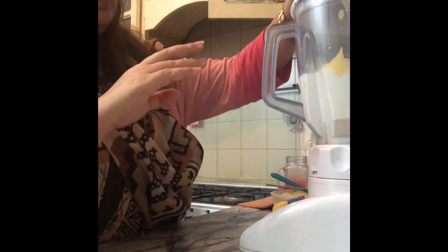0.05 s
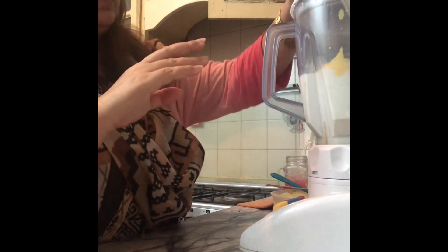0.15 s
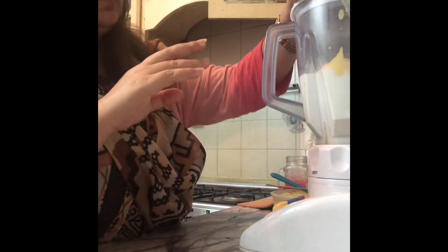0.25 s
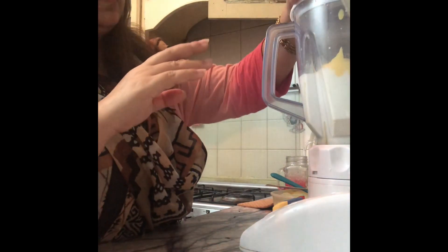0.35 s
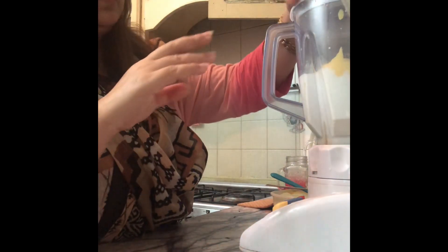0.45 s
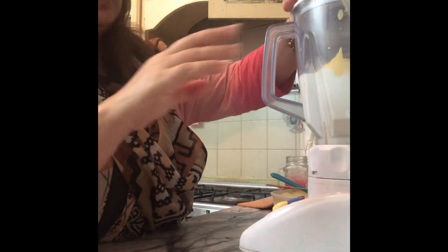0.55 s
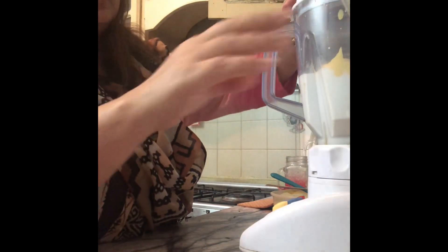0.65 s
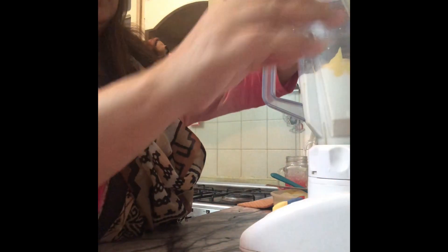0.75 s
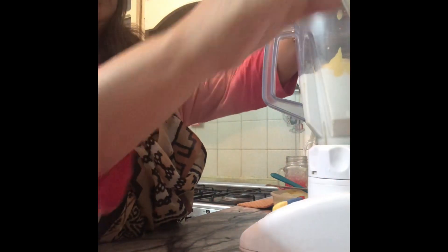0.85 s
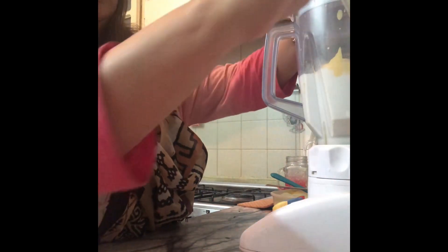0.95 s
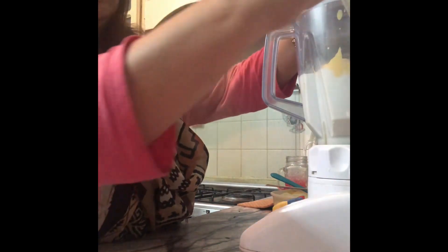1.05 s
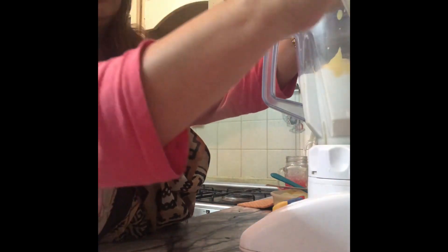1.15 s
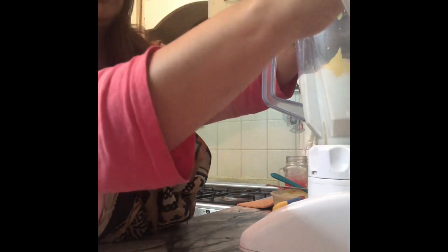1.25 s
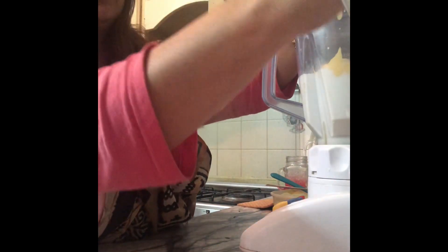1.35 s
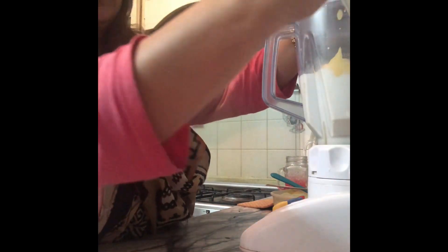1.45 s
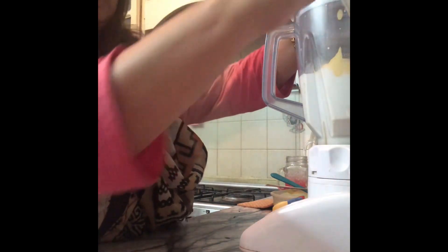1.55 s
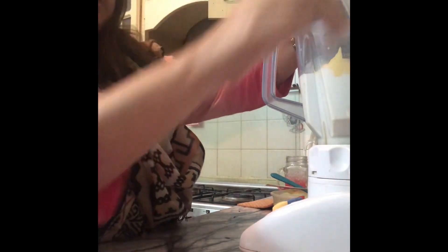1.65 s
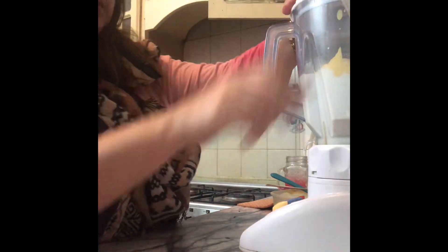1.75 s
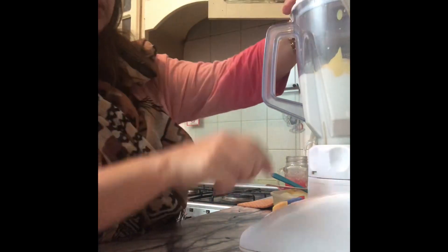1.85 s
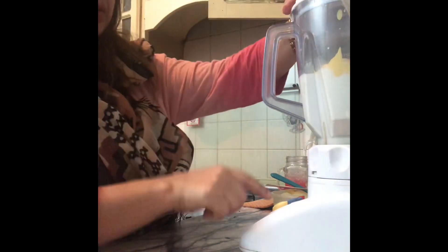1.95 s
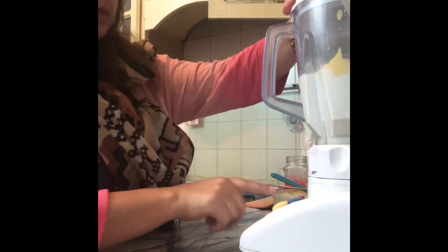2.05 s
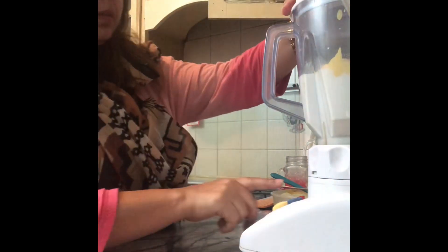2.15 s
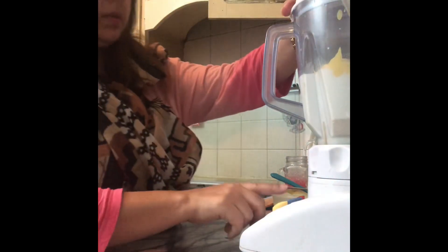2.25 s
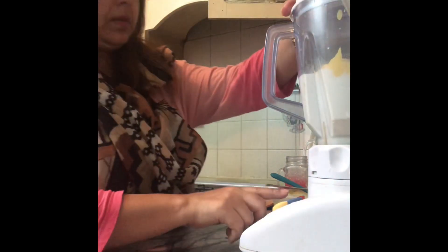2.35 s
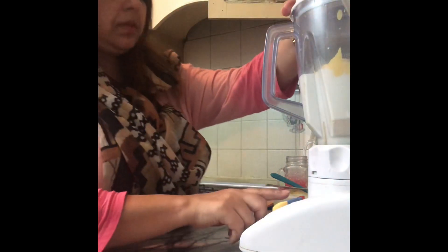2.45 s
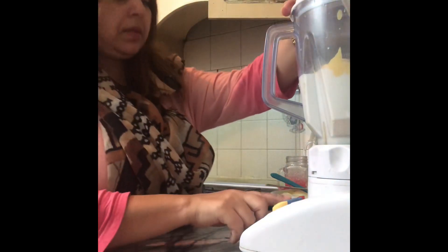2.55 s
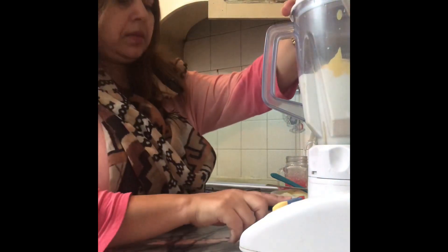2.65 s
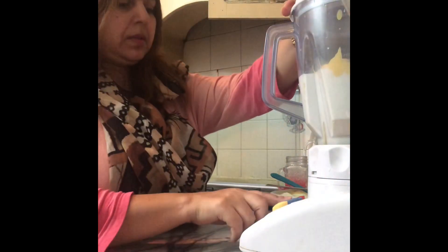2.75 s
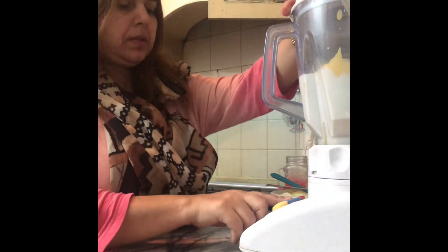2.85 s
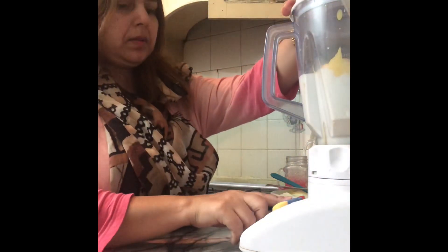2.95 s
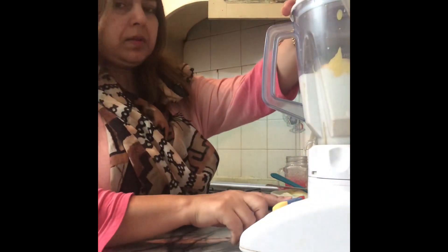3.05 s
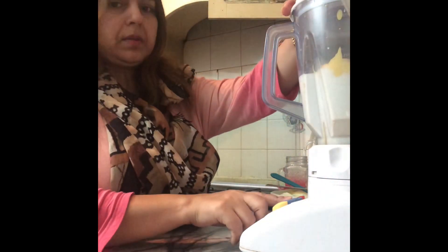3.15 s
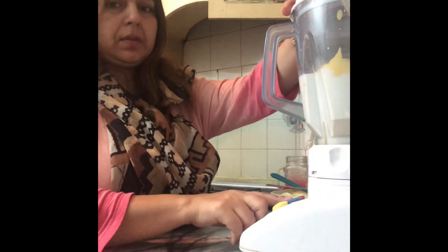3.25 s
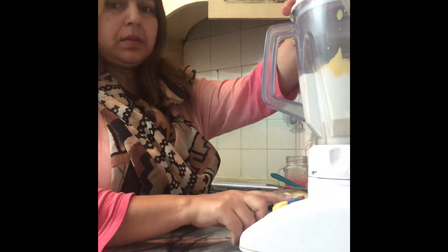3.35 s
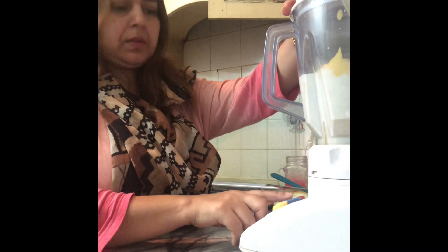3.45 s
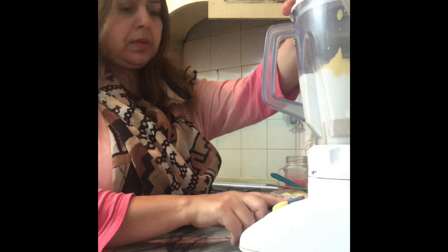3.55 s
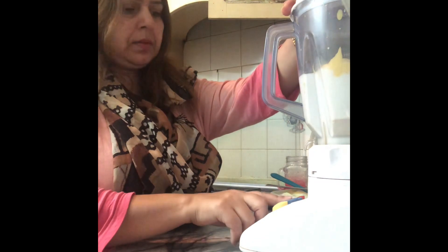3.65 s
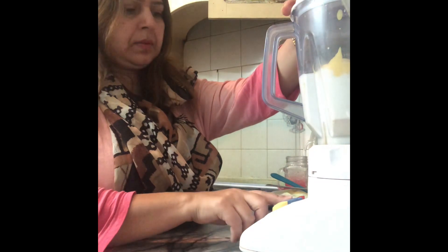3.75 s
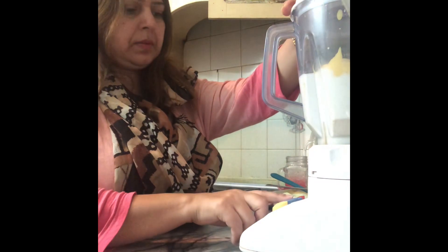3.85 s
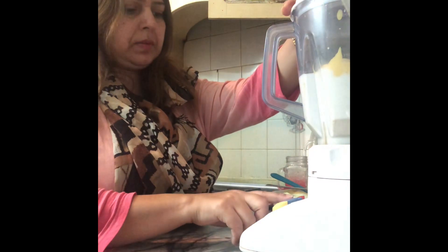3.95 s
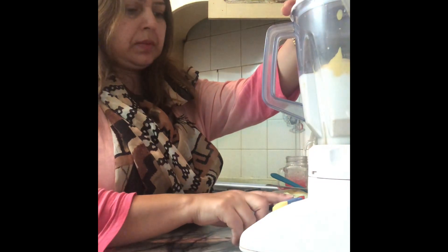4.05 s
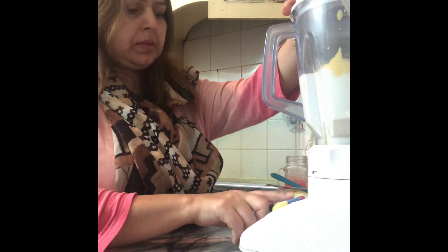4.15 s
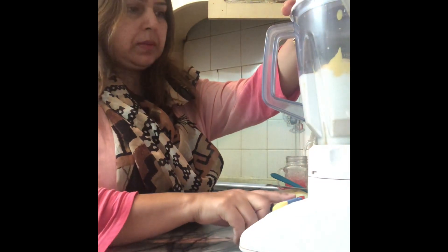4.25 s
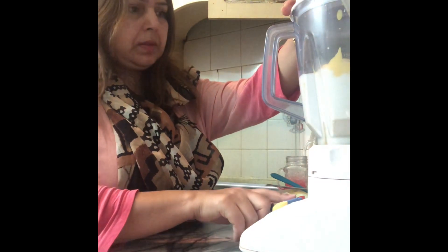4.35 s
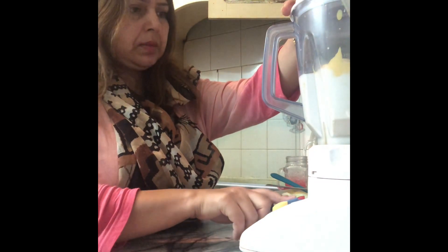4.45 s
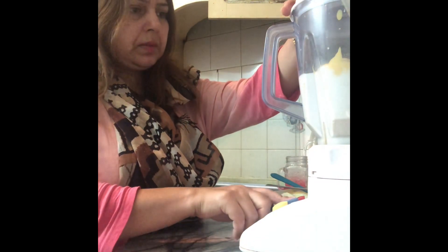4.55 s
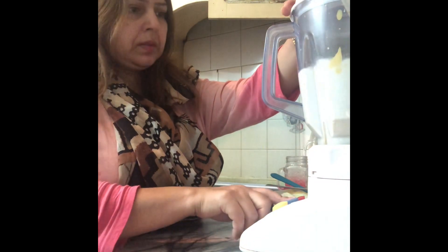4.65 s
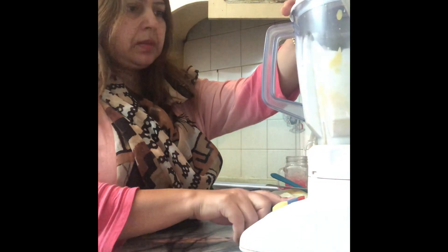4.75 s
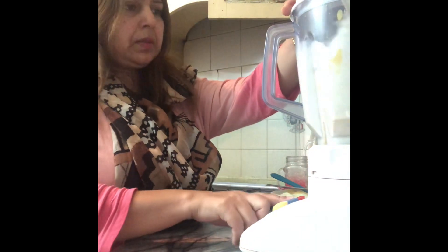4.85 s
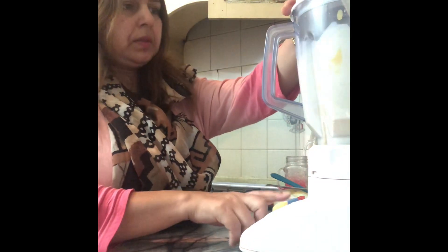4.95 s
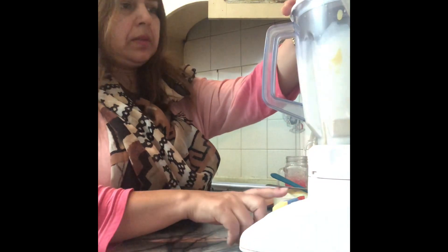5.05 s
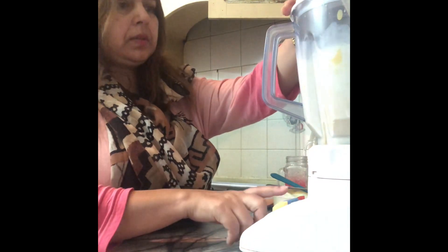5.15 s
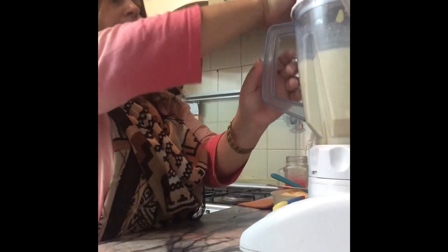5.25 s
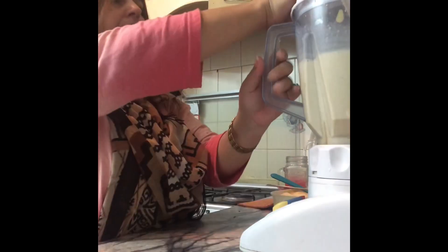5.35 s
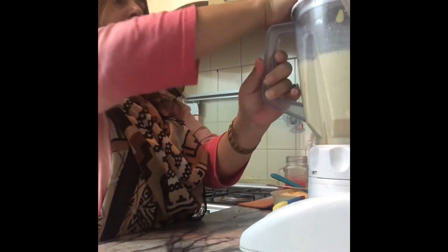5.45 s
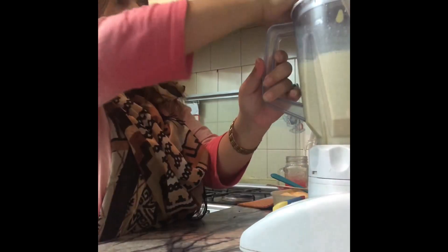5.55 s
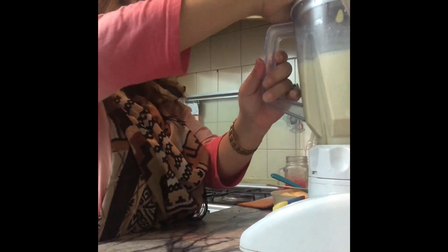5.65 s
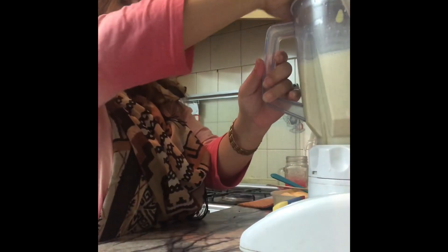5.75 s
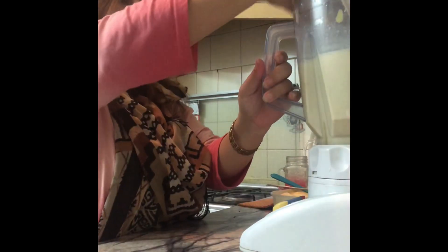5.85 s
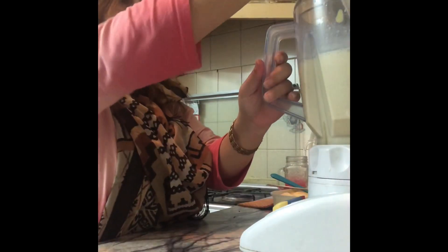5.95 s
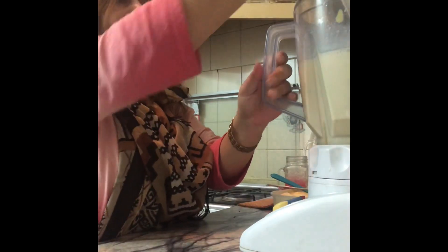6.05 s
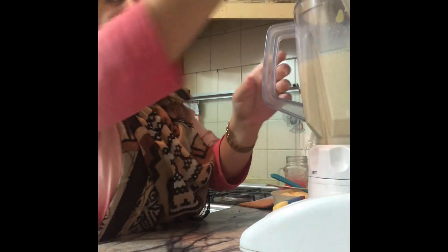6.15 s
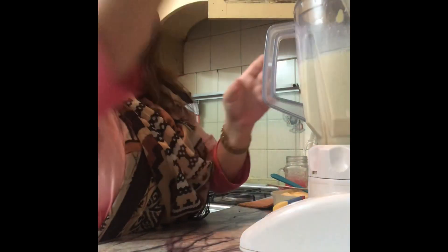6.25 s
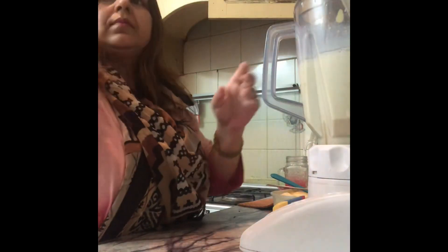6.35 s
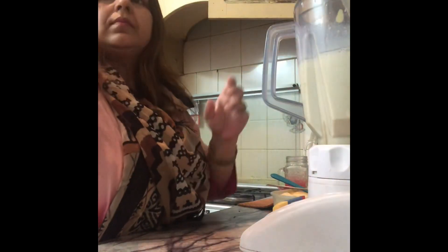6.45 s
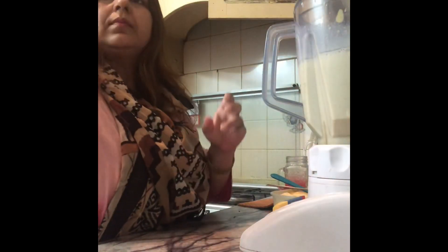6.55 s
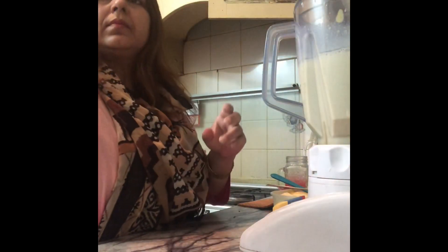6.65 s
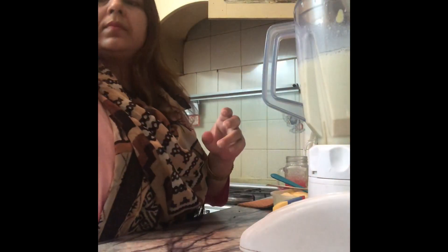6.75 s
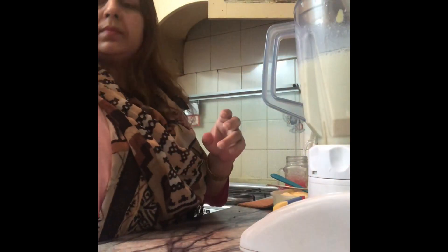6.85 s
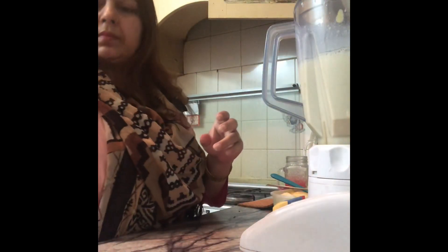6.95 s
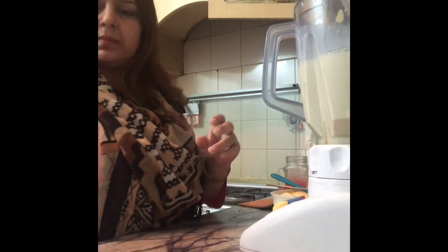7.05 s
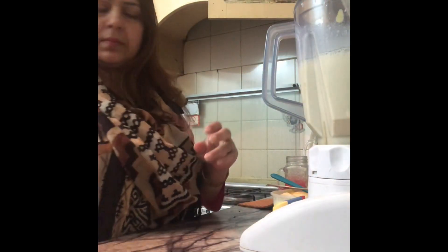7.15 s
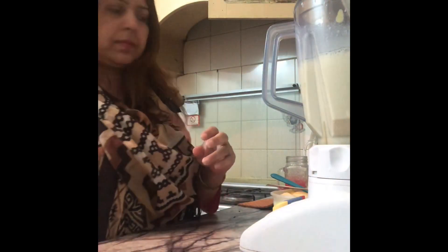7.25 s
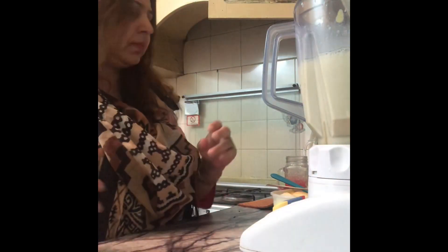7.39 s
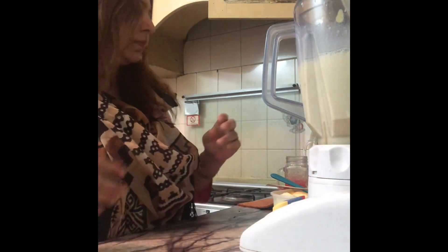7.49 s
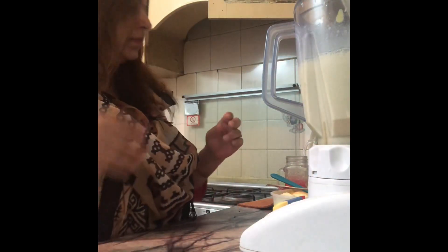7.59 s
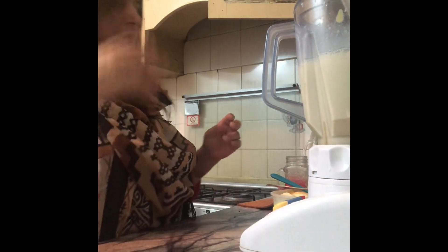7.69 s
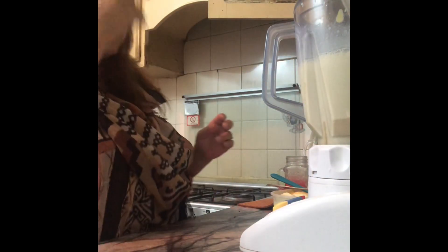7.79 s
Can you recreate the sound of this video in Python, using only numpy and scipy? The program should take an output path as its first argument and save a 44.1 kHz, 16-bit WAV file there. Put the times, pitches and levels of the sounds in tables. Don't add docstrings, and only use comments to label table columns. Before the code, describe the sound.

Close to a home kitchen worktop, a spoon clacks hard at once and a few hollow tub knocks and rustles follow. One bright plastic tap, then near quiet over appliance hum. A blender bursts on, growling and rattling through frozen lumps, and is cut off abruptly. A lid is twisted with hollow knocks, bangles tick faintly, it lands with a heavy thump and rocks softly. Small close microphone, short tiled echo.

```python
import sys
import numpy as np
from scipy import signal
from scipy.fft import rfft, irfft, next_fast_len
from scipy.io import wavfile
from scipy.ndimage import uniform_filter1d

SR = 44100
rng = np.random.default_rng(int(sys.argv[2]) if len(sys.argv) > 2 else 0)


def unload_audio(sound):
    columns = np.transpose(np.atleast_2d(sound))
    steps = np.round(np.clip(columns, -1, 1) * 32767)
    wavfile.write(sys.argv[1], SR, steps.astype(np.int16))


def nominal_scale(level):
    x = np.asarray(level, float) / 20
    return 10 ** x


N = 344862
TIME = np.arange(N) / SR
CUT_S, CUT_FADE_S = 5.2, 0.014

# thump, hollow, mid, tick [Hz]
EDGES_HZ = (60, 250, 700, 3500, 15000)

# (frequency [Hz], density [dB per Hz])
HUM_COLOUR = [(15, -56), (25, -34), (108, -0.5), (166, -12), (200, -3), (223, -22), (256, -7.5), (463, -15),
              (531, -17.5), (624, -20), (1130, -26), (1740, -32.5), (2220, -32.5), (11900, -41.5),
              (16000, -55)]
HUM_DB = -59
# (frequency [Hz], level [dB])
MAINS = [(129, -70), (199.5, -72.5), (296, -76.5), (1750, -90)]
# (frequency [Hz], width [Hz], level [dB])
FRIDGE = [(255.9, 7.7, -70.5), (700, 14, -78.5)]
# (frequency [Hz], t60 [s])
ROOM_T60 = [(100, 0.74), (500, 0.4), (2500, 0.57), (8000, 0.33), (16000, 0.41)]
# (spoon [dB], blender [dB], lid [dB])
ROOM_DB = (-10, -10, -9.5)

# (peak time [s], level [dB], 40 dB rise [s], 40 dB fall [s])
RUSTLE = [(0.0, -57, 0.11, 0.5), (0.125, -41.5, 0.011, 0.81), (0.424, -48.5, .03, 0.23),
          (0.48, -54, .05, 0.22), (0.646, -57.5, .03, 0.07), (0.55, -52.5, 0.22, -0.25),
          (4.33, -62.5, .08, 0.4), (1.94, -53, 0.16, .5), (2.05, -72, 0.17, .5), (2.675, -56.5, .18, .5),
          (2.77, -67, 0.79, 0.1), (5.325, -60, .05, .05), (5.24, -64, 0.031, 2.5),
          (5.445, -51.5, .12, -0.25), (5.515, -53.5, 0.092, 0.34), (5.575, -50, .12, -0.2),
          (5.62, -52, 0.098, 0), (5.806, -41, .008, 0.1), (5.834, -41, 0.048, 0.09),
          (5.88, -60.5, .1, 0.25), (6.034, -50.5, 0.022, 0.07), (6.06, -64, 0.054, 1),
          (6.165, -66.5, .02, 1.9), (6.52, -65.5, 1.2, 0.5), (6.645, -58.5, 0.11, 1.5),
          (7.548, -62, .01, .1), (7.172, -60, .01, .08), (7.174, -67.5, 0.079, 2.8),
          (7.285, -56, 0.066, 0.27)]
# (frequency [Hz], density [dB per Hz])
RUSTLE_COLOUR = [(290, -47.5), (500, -16), (562, -7.5), (773, -6), (880, -2), (1050, -5), (6800, -13.5),
                 (16000, -35)]
# (peak time [s], level [dB], rise [s], fall [s], deep sway [dB rel])
SHAKE = [(0.0, -36.5, .1, 0.4, -3.5), (0.3, -45.5, 0.22, .9, -14), (0.45, -33.5, 0.17, 0.56, -5),
         (0.677, -39, 0.11, 0.075, -13), (0.751, -62, 0.29, 0.56, 9), (5.22, -40.5, 0.05, 0.25, 4),
         (5.5, -43.5, 0.53, 0.36, -14), (5.582, -29, 0.13, 0.1, -10), (5.66, -42, .2, 0.53, -4.5),
         (6.05, -43, 0.096, 0.23, -1.5), (6.3, -55.5, 0.21, 0.37, -20), (6.72, -25.5, 0.12, 0.61, -14),
         (6.93, -30, 0.21, .12, -4), (6.99, -29, 0.11, 0.29, -16.5), (7.1, -41, 0.49, 5.9, 3.5),
         (7.8, -48.5, 2.9, 0.44, 0)]
# (frequency [Hz], level [dB], t60 [s])
WORKTOP = [(78, -6.5, 0.43), (130, 11.5, 0.13), (207, -3, 0.047), (328, 0.5, 0.29), (464, -1, 0.076),
           (570, -2, 0.051), (655, -6, 0.038), (910, 1.5, 0.021), (1090, -5.5, .02), (1340, -3.5, 0.025),
           (1710, -4, 0.099), (2624, -23.5, 0.02), (3770, -17.5, 0.0025), (6037, -16, 0.0033)]
# (peak time [s], level [dB], rise [s], fall [s])
TWIST = [
    (5.25, -50.5, .05, 0.23),
    (5.47, -43, .1, .5),
    (5.6, -39.5, 0.28, 0.44),
    (5.76, -48, .4, 0.18),
]

# (time [s], tick [dB], thump [dB rel], hollow [dB rel], mid [dB rel])
SPOON_HITS = [
    (0.129, -10, -25, -16, -11),
]
# (frequency [Hz], level [dB], t60 [s])
SPOON = [(1150, -19, 0.0075), (3600, -17, 0.011), (5980, 1.5, 0.015), (7300, -8.5, 0.023),
         (9750, -9.5, 0.0088), (11027, -12.5, 0.012)]
# (time [s], mid [dB], thump [dB rel], hollow [dB rel], tick [dB rel])
CLACK_HITS = [
    (0.1425, -5.5, -2, -10, -9.5),
    (0.148, -12, -1, -10, -8.5),
]
# (frequency [Hz], level [dB], t60 [s])
CLACK = [(74, 6, 0.46), (186, -2.5, 0.071), (324.8, -7.5, 0.033), (1140, 0, 0.0069), (1640, -4, 0.011),
         (2770, -10, 0.0025), (3516, -5.5, .006), (5850, -6.5, 0.0069), (7464, -10.5, 0.013)]
# (time [s], mid [dB], thump [dB rel], hollow [dB rel], spot pitch [Hz])
TUB_HITS = [(0.435, -28, 5.5, -20, 700), (0.484, -31, -10, 1, 700), (0.544, -42, 11, 6, 1030),
            (0.641, -40, -18, 4.5, 2060), (0.662, -47, -8, 12, 850), (1.668, -58.5, 0.5, 17, 746),
            (1.936, -33, -10, -2.5, 1890), (2.167, -49.5, -30.5, 9, 1194), (2.529, -57.5, 7, -6, 702),
            (2.668, -47.5, -22, 1.5, 886), (4.315, -46.5, -14, -6, 880), (4.33, -49, -25.5, 7.5, 885)]
# (frequency [Hz], level [dB], t60 [s])
TUB = [(90.6, -10.5, 0.16), (267, 5, 0.064), (329.9, 6, 0.1), (435, 0, 0.028), (1924, -8.5, 0.003),
       (4233, -11.5, 0.0036)]
# (time [s], mid [dB], thump [dB rel], hollow [dB rel], tick [dB rel])
JAR_HITS = [
    (1.165, -48.5, -4, -14, 5.5),
    (1.274, -51.5, -30, -20, -2),
    (1.302, -14.5, -45, -20, 6),
    (4.407, -52.5, -3, 2, 4),
    (4.425, -36, -6, 1.5, 5.5),
]
# (frequency [Hz], level [dB], t60 [s])
JAR = [(800, 2, .02), (1650, -7, .008), (2560, 9, .012), (3600, -9, .004), (4950, -6, .008),
       (5500, 5, .012), (6500, -5, .008), (7300, 6, .006), (8240, -4, .008), (2270, 7, .012)]
# (peak time [s], pitch [Hz], level [dB], rise [s], fall [s])
DRUMS = [(0.44, 255, -29, .06, .08), (0.552, 305, -31, .06, .06), (0.666, 480, -37, .02, .08),
         (1.675, 450, -52, .02, .06), (2.2, 330, -54, .05, .15), (5.225, 330, -42, .04, .1),
         (5.39, 330, -47, .04, .06), (5.445, 310, -34, .04, .08), (5.485, 320, -38, .05, .1),
         (5.583, 320, -18.5, .025, .045), (5.625, 320, -30, .05, .035), (5.76, 320, -44, .2, .15),
         (6.168, 1300, -50, .015, .04), (6.68, 930, -24, .05, .1), (6.685, 460, -21, .05, .15),
         (6.7, 130, -21, .1, .18), (6.93, 128, -30, .1, .1), (7.0, 130, -33, .1, .15),
         (7.47, 500, -50, .02, .08), (7.64, 550, -48, .015, .08), (7.73, 500, -50, .02, .08),
         (1.94, 1250, -44, .015, .06)]
# (time [s], level [dB])
PAN = [
    (1.4, -80.5),
    (1.75, -74),
    (2.1, -78),
    (2.25, -90),
    (2.56, -80),
    (2.7, -91),
    (3.3, -84.5),
]
PAN_HZ = 1720

# (time [s], commutator [Hz], effort [dB], bite of thick mix [dB], whine [dB])
MOTOR = [
    (4.5, 2400, -25, -4, -48),
    (4.64, 2361, -14.5, 2, -51),
    (4.77, 2330, -16, -1, -43),
    (4.83, 2470, -14, -1.5, -32),
    (4.91, 2395, -14.5, -2, -31),
    (4.968, 2502, -17, 2.5, -35.5),
    (5.04, 2696, -14.5, -0.5, -31.5),
    (5.145, 2400, -13.5, -0.5, -35.5),
    (5.2, 2620, -23, -0.5, -41),
]
SWITCH_ON_S, SPIN_UP_S, COMMUTATOR_BARS, WHINE_BEAT_HZ, FEET_HZ = 4.42, 0.028, 12, 46.32, 71.3
# (level over effort [dB], gain per bite [dB/dB])
GROWL = (0, 0.81)
CHURN = (.5, -0.77)
RATTLE = (-9.5, -0.45)
# (frequency [Hz], width [Hz], level [dB])
BLENDER_BODY = [(72, 7.4, 4.5), (123, 29, -5), (190, 26, 3.5), (334, 77, 5.5), (430, 31, 11.5),
                (564, 66, 0.5), (708.4, 30, -1), (845, 52, -1.5), (1000, 71, -5), (1180, 68, -0.5),
                (1560, 82, -15.5), (1990, 580, -34), (2246, 49, -15), (2690, 90, -19)]
# (frequency [Hz], density [dB per Hz])
BLENDER_AIR = [(710, -50.5), (1200, 5), (1750, -4), (2620, -15), (3050, -29), (4170, -28.5), (4800, -32),
               (7410, -27), (8440, -31.5), (15750, -29.5), (16100, -46.5)]
# (frequency [Hz], width [Hz], level over air noise [dB])
HOUSING = [(3640, 260, 7), (4200, 290, 3.5), (5400, 580, -1), (7340, 690, -7), (10900, 860, -9)]
# (peak time [s], level [dB], rise [s], fall [s])
SHUDDERS = [
    (4.6, -21.5, 0.27, 0.38),
    (4.75, -25, .15, .9),
    (5.05, -27, .2, .2),
    (5.17, -25.5, .2, .3),
]
# (peak time [s], level [dB], rise [s], fall [s])
SPRAY = [
    (4.426, -37, 0.01, 0.071),
    (4.467, -34.5, .04, 0.22),
    (4.55, -27.5, 0.13, 1.1),
    (4.92, -30.5, 0.88, 4.5),
]
# (time [s], mid [dB], thump [dB rel], hollow [dB rel], spot pitch [Hz])
LUMP_HITS = [(4.454, -27.5, -19, 0.5, 703), (4.464, -16.5, -19, -11.5, 762),
             (4.551, -6.5, -12.5, -8.5, 703), (4.579, -10.5, -8.5, -14.5, 1170),
             (4.607, -10.5, -5.5, 1, 703), (4.708, -9.5, -1.5, -11, 845), (4.847, -8.5, -15.5, -6.5, 1000),
             (4.9, -18.5, -31, -11.5, 1180), (4.931, -10.5, -13.5, 0, 834), (5.002, -7, -13, -1.5, 861),
             (5.123, -9.5, -18, -20.5, 1160), (5.134, -15.5, -5.5, -3, 904)]
# (peak time [s], pitch [Hz], level [dB], rise [s], fall [s])
SURGES = [(4.44, 450, -31, 0.027, .05), (4.47, 1998, -34, 0.032, .08), (4.487, 558.7, -26, .1, .08),
          (4.52, 2422, -30, .08, 0.077), (4.556, 2720, -29, .03, .05), (4.556, 2157, -30, .03, .08),
          (4.59, 1170, -21, .06, 0.11), (4.612, 1768, -28, .04, .1), (4.635, 330, -21, .07, .07),
          (4.67, 300, -20, .06, .1), (4.68, 847, -21, .15, .1), (4.712, 690, -17, .015, .1),
          (4.775, 430, -19.5, .08, .1), (4.835, 421.8, -18, 0.16, .15), (4.855, 978, -17, .06, .2),
          (4.885, 1222, -22, .1, .08), (4.88, 2180, -30.5, .15, .1), (4.915, 1190, -23, .1, 0.092),
          (4.928, 2121, -28, 0.035, .08), (4.935, 561.3, -15.5, 0.071, 0.14), (4.945, 853, -20, .12, 0.13),
          (4.965, 200, -19, .08, .1), (5.008, 862.4, -18, .03, .1), (5.01, 1280, -24, .04, .1),
          (5.05, 420, -20.5, .1, .1), (5.095, 306.6, -19, .1, .15), (5.125, 1185, -15, .015, .1),
          (5.137, 855, -19, .05, .07), (5.172, 195, -18, .08, .08), (5.185, 2626, -32.5, .1, .1)]
# (peak time [s], pitch [Hz], level [dB], rise [s], fall [s])
FIZZ = [(4.545, 11000, -40, .02, .3), (4.56, 4200, -36, .05, .3), (4.6, 7900, -41, .1, .15),
        (4.652, 7700, -38, .05, .06), (4.665, 4150, -36, .1, .15), (4.72, 5200, -40, .1, .2),
        (4.79, 10300, -44, .1, .3), (4.86, 7350, -39, .15, .3), (4.88, 4100, -38, .2, .2),
        (4.95, 7300, -41, .1, .2), (4.95, 5300, -41, .2, .2), (5.07, 5400, -38, .2, .2),
        (5.02, 6700, -40, .05, .05), (5.165, 7200, -40, .1, .1), (5.15, 10600, -43, .15, .15)]
# (time [s], tick [dB], mid [dB rel])
CHIPS = [
    (4.4238, -26.5, -14),
    (4.466, -26, -2.5),
    (4.543, -28, -9.5),
    (4.608, -25.5, 0.5),
    (4.653, -27.5, -9.5),
    (4.901, -23, -18),
    (4.931, -24, -18),
    (5.188, -28.5, -15),
    (5.231, -52, -15),
]
# (frequency [Hz], level [dB], t60 [s])
CHIP = [(4200, -4.5, .006), (5300, -4.5, .005), (7700, 3, 0.0072), (10700, -1, .006), (14100, -1, .004)]

# (time [s], mid [dB], thump [dB rel], hollow [dB rel], spot pitch [Hz])
LID_HITS = [(5.307, -51.5, 11, 4.5, 696), (5.329, -55, 7, -22, 805), (5.381, -45.5, 6.5, 5, 930),
            (5.438, -38, -31, 0, 1390), (5.506, -36.5, 2, -3, 980), (5.547, -36, -14, 5, 825),
            (5.575, -39, -21, 8, 890), (5.61, -31, -17, 4.5, 930), (5.62, -42, 6, 6, 851),
            (5.713, -49, 11, -5, 927), (5.805, -37, -2, -15, 842), (5.828, -33, -7, -5, 2860),
            (5.844, -35.5, -19, -9, 857), (6.032, -36, -20, -9, 850), (6.071, -50.5, -2.5, 3.5, 807),
            (6.163, -42.5, -13, -23.5, 1270)]
# (frequency [Hz], level [dB], t60 [s])
LID = [(109.2, 15, 0.11), (248, 2, 0.041), (320, 19.5, 0.06), (2400, -11.5, 0.003), (4600, -16, 0.0026)]
# (time [s], level [dB])
BANGLES = [
    (6.3762, -52),
    (6.3932, -48.5),
    (6.487, -54),
    (6.52, -52.5),
]
# (frequency [Hz], level [dB], t60 [s])
BANGLE = [(5850, -7, 0.0087), (7110, -15, .015), (8774, -17, .015), (9900, -16, 0.014), (12790, -23, .008)]
# (time [s], mid [dB], thump [dB rel], hollow [dB rel], tick [dB rel])
DROP_HITS = [
    (6.655, -17, -7, -1, -9.5),
    (6.673, -19.5, 6.5, 6, -37),
    (6.699, -31, 19, 16.5, -35.5),
    (6.884, -26.5, 0, 4, -17),
    (6.929, -35, 11.5, 1, -29.5),
]
# (time [s], mid [dB])
ROCK_HITS = [
    (6.999, -47),
    (7.17, -46.5),
    (7.264, -49),
    (7.355, -48),
    (7.452, -54.5),
    (7.541, -49.5),
    (7.636, -52),
    (7.722, -53.5),
    (7.805, -58),
]
# (thump [dB rel], hollow [dB rel], tick [dB rel])
ROCK_REL_DB = (15, 4.5, -16)


def level(x, db=0):
    return x * nominal_scale(db) / np.sqrt(np.mean(x ** 2))


def noise():
    return rng.standard_normal(N)


def band(x, low_hz, high_hz):
    return signal.sosfilt(signal.butter(2, (low_hz, high_hz), "band", fs=SR, output="sos"), x)


def colour(x, points):
    hz, db = np.transpose(points)
    f = np.maximum(np.fft.rfftfreq(len(x), 1 / SR), 1)
    gain = nominal_scale(np.interp(np.log(f), np.log(hz), db))
    return level(irfft(rfft(x) * gain, len(x)))


def ring(x, centres_hz, widths_hz, gains):
    size = next_fast_len(len(x))
    f = np.fft.rfftfreq(size, 1 / SR)
    response = 0
    for c, w, g in zip(centres_hz, widths_hz, gains):
        response = response + g / (1 + 2j * (f - c) / w) + g / (1 + 2j * (f + c) / w)
    return irfft(rfft(x, size) * response, size)[:len(x)]


def flicker(rate_hz, db):
    k = int(SR / rate_hz)
    steps = np.repeat(rng.standard_normal(N // k + 1), k)
    return nominal_scale(db * uniform_filter1d(steps, k)[:N])


def swells(rows, lift_db=0):
    power = np.zeros(N)
    for (s, db, rise_s, fall_s, *_), extra_db in zip(rows, np.broadcast_to(lift_db, len(rows))):
        span = slice(max(int((s - 2 * rise_s) * SR), 0), int((s + 2 * fall_s) * SR))
        distance = np.maximum((s - TIME[span]) / rise_s, (TIME[span] - s) / fall_s)
        power[span] += nominal_scale(db + extra_db - 40 * distance) ** 2
    return np.sqrt(power)


def hits(rows, modes, crack, contact_s, tick_db=None, spread_db=4.0, lead=2, soft=0.042):
    t = np.arange(2 ** 14) / SR
    out = np.zeros(N + len(t))
    spots = tick_db is not None
    contact = max(contact_s, 2e-4)
    shape = (1 - np.exp(-t / (soft * contact))) * np.exp(-t / contact)
    for s, main_db, *rel_db, last in rows:
        hz, db, t60 = np.transpose(list(modes) + [(last, 1.5, 0.014)] * spots)
        push = rng.standard_normal(len(t)) * shape
        push = irfft(rfft(push) / (np.abs(rfft(push)) + 1e-12))
        push = push * shape / uniform_filter1d(np.abs(push) + 1e-12, size=48)
        chance = rng.standard_normal((2, len(hz)))
        mode_hz = hz * (1 + 0.006 * chance[0])
        mode_gain = nominal_scale(db + spread_db * chance[1])
        body = ring(push, mode_hz, np.log(1000) / np.pi / t60, mode_gain) + crack * push
        mid_top_hz = min(2.78 * last, 3500) if spots else 3500
        tops_hz = (EDGES_HZ[1], EDGES_HZ[2], mid_top_hz, EDGES_HZ[4])
        side_db = main_db + np.array(rel_db + [tick_db if spots else last])
        gains_db = np.insert(side_db, lead, main_db)
        start = int(s * SR)
        for i, (low_hz, high_hz, part_db) in enumerate(zip(EDGES_HZ, tops_hz, gains_db)):
            part = band(body, low_hz, high_hz) * (-1) ** i
            out[start:start + len(t)] += part * nominal_scale(part_db) / np.abs(part).max()
    return out[:N]


def surges(rows, width_hz, clean, rough):
    t = np.arange(2 ** 14) / SR
    out = np.zeros(N + len(t))
    ago = t - t.mean()
    for s, hz, db, rise_s, fall_s in rows:
        grain = level(ring(rng.standard_normal(len(t)), [hz], [width_hz], [1]))
        tone = clean * np.sin(2 * np.pi * hz * t) + rough * grain
        start = int((s - t.mean()) * SR)
        out[start:start + len(t)] += tone * nominal_scale(db - 48 * np.maximum(-ago / rise_s, ago / fall_s) ** 1.2)
    return out[:N]


def room(x, wet_db):
    t, tail = np.arange(SR) / SR, 0
    hz, t60 = np.transpose(ROOM_T60)
    for centre_hz in 60 * 2. ** np.arange(8.1):
        decay_s = np.interp(np.log(centre_hz), np.log(hz), t60)
        octave = band(rng.standard_normal(SR), centre_hz / np.sqrt(2), centre_hz * np.sqrt(2))
        tail = tail + octave * np.exp(-np.log(1000) * t / decay_s)
    tail = tail * (1 - np.exp(-t / 0.0015))
    return x + signal.fftconvolve(x, tail * nominal_scale(wet_db) / np.sqrt(np.sum(tail ** 2)))[:N]


def hum():
    return colour(noise(), HUM_COLOUR) * flicker(2.1, 0.8) * nominal_scale(HUM_DB)


def mains():
    return sum(np.sqrt(2) * np.sin(2 * np.pi * hz * TIME) * nominal_scale(db) * flicker(6, 2.7) for hz, db in MAINS)


def fridge():
    return sum(level(ring(noise(), [hz], [width_hz], [1]), db) for hz, width_hz, db in FRIDGE)


def hands():
    rub = colour(noise() * flicker(93, 1.7), RUSTLE_COLOUR) * swells(RUSTLE)
    hz, db, t60 = np.transpose(WORKTOP)
    stir = ring(noise(), hz, 12.0 / t60, nominal_scale(db))
    shake = level(band(stir, 130, 450), -3.5) * swells(SHAKE)
    sway = level(band(stir, 64, 120)) * swells(SHAKE, np.transpose(SHAKE)[4])
    twist = level(ring(noise(), [320], [30], [1])) * swells(TWIST)
    return rub + shake + sway + twist


def spoon():
    strike = hits(SPOON_HITS, SPOON, 0.017, contact_s=0.0072, lead=3)
    clack = hits(CLACK_HITS, CLACK, 0.17, contact_s=0.005)
    tub = hits(TUB_HITS, TUB, 0.09, contact_s=0.008, tick_db=-21, soft=0.18)
    jar = hits(JAR_HITS, JAR, 0.45, contact_s=0.0059)
    return strike + clack + tub + jar


def drums():
    return surges(DRUMS, 40, clean=1.1, rough=0.3)


def pan():
    s, db = np.transpose(PAN)
    gain = nominal_scale(np.interp(TIME, s, db, left=-140, right=-140))
    return level(band(noise(), PAN_HZ - 35, PAN_HZ + 35)) * gain


def blender():
    s, hz, effort_db, bite_db, whine_db = np.transpose(MOTOR)
    turns = np.cumsum(np.interp(TIME, s, hz) * flicker(150, 0.17)) / SR / COMMUTATOR_BARS

    def share(law):
        return nominal_scale(np.interp(TIME, s, effort_db + law[0] + law[1] * bite_db))

    beats = np.diff(np.floor(2 * turns), prepend=0) * noise() * flicker(45, 1.3)
    slurry = level(beats) + 0.86 * noise() * flicker(60, 0.83)
    centre_hz, width_hz, db = np.transpose(BLENDER_BODY)
    body = ring(slurry, centre_hz, width_hz, nominal_scale(db) * (-1) ** np.arange(len(db)))
    air = colour(noise(), BLENDER_AIR)
    centre_hz, width_hz, db = np.transpose(HOUSING)
    air = air + ring(air, centre_hz, width_hz, nominal_scale(db))

    feet = level(ring(slurry, [FEET_HZ], [14], [1])) * swells(SHUDDERS)
    growl = level(band(body, 120, 441)) * share(GROWL)
    churn = level(band(body, 514, 1300)) * share(CHURN)
    rattle = level(band(level(body) + 0.2 * air, 1300, 4600)) * share(RATTLE)
    hiss = level(band(air, 3300, 17000)) * flicker(90, 2.1) * swells(SPRAY)
    whine = np.sqrt(2) * np.sin(2 * np.pi * COMMUTATOR_BARS * turns) * flicker(130, 2.3)
    whine = whine * nominal_scale(np.interp(TIME, s, whine_db))
    beat_turns = np.cumsum(WHINE_BEAT_HZ * flicker(20, 1.5)) / SR
    whine = whine * (1 + 0.95 * np.sin(2 * np.pi * beat_turns))

    running = (1 - np.exp(-np.clip(TIME - SWITCH_ON_S, 0, None) / SPIN_UP_S)) ** 2
    return (growl + churn + rattle + whine + feet) * running + hiss * (TIME > SWITCH_ON_S)


def chips():
    rows = [(s, db, -60, -60, mid_db) for s, db, mid_db in CHIPS]
    return hits(rows, CHIP, 0.3, contact_s=0.0027, lead=3)


def jar_surges():
    return surges(SURGES, 70, clean=0.9, rough=0.8)


def lumps():
    hz, width_hz, db = np.transpose(BLENDER_BODY)
    modes = np.transpose([hz, db, 3.4 / width_hz])
    return hits(LUMP_HITS, modes, 0.023, contact_s=0.0065, tick_db=-25.5)


def fizz():
    return surges(FIZZ, 420, clean=0, rough=1)


def lid():
    knocks = hits(LID_HITS, LID, 0.13, contact_s=0.0055, tick_db=-22, soft=0.2)
    drop = hits(DROP_HITS, WORKTOP, 0.2, contact_s=0.019, soft=0.12)
    rock = hits([(*row, *ROCK_REL_DB) for row in ROCK_HITS], WORKTOP, 0.056, contact_s=0.033)
    return knocks + drop + rock


def bangles():
    rows = [(s, db, -60, -60, -40) for s, db in BANGLES]
    return hits(rows, BANGLE, 0.04, contact_s=0.025, lead=3)


def scene():
    before = room(spoon(), ROOM_DB[0]) + room(lumps() + blender(), ROOM_DB[1]) + jar_surges() + fizz()
    fade = np.clip((CUT_S - TIME) / CUT_FADE_S + 0.5, 0, 1)
    after = room(lid() + bangles(), ROOM_DB[2])
    kitchen = hum() + mains() + fridge() + pan()
    mix = before * fade + after + hands() + drums() + chips() + kitchen
    return mix[None]


def band_limit(x):
    return signal.sosfilt(signal.butter(12, 16820, fs=SR, output="sos"), x)


def record(dry):
    mic = signal.sosfilt(signal.butter(3, 50, "high", fs=SR, output="sos"), dry)
    mic = 1.3 * np.tanh(mic / 1.3)
    mic = signal.sosfilt(signal.ellip(6, 0.3, 30, 15900, fs=SR, output="sos"), mic)
    return band_limit(mic)


dry = scene()
out = record(dry)
unload_audio(out)
```